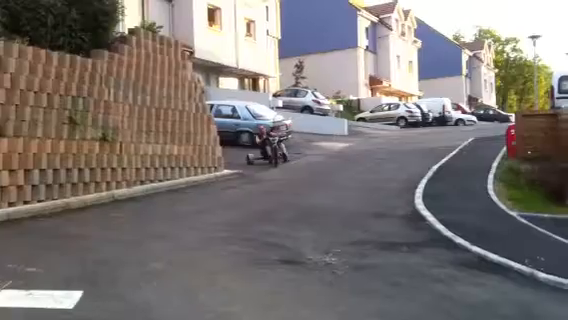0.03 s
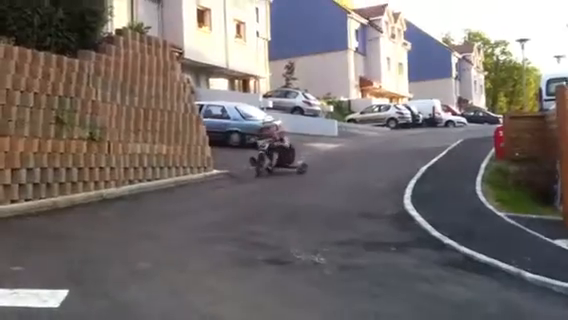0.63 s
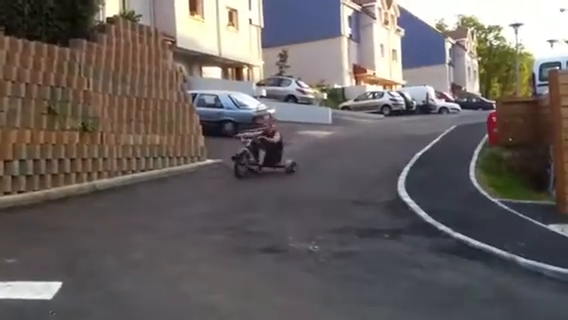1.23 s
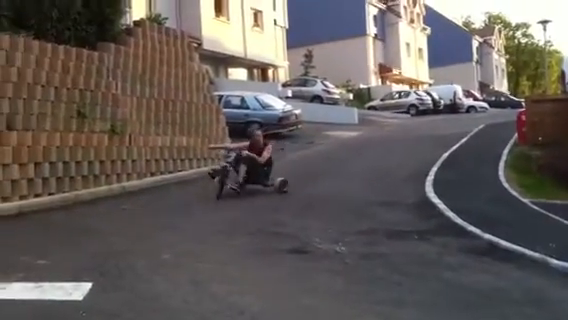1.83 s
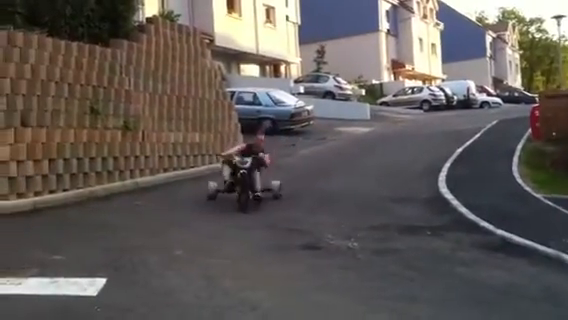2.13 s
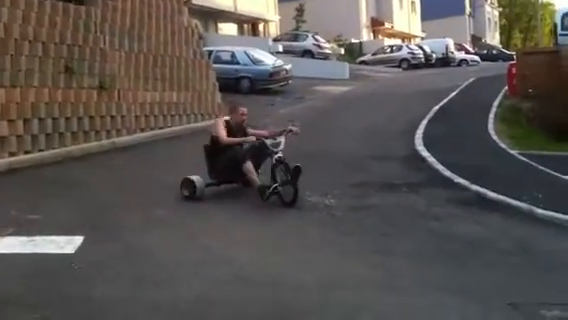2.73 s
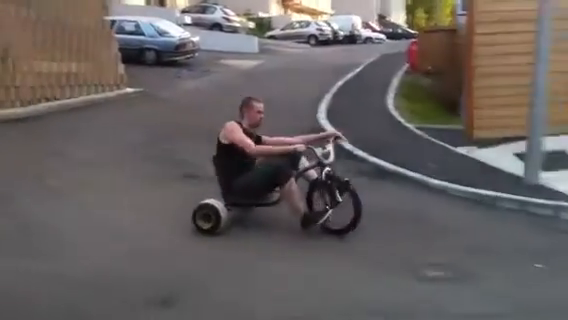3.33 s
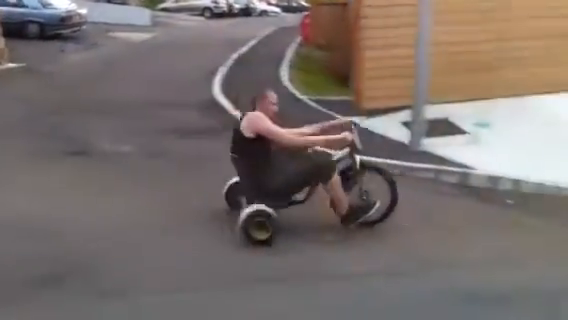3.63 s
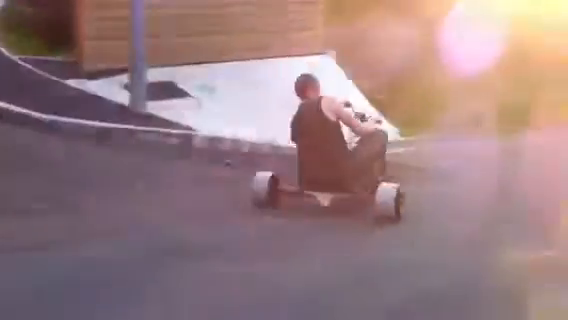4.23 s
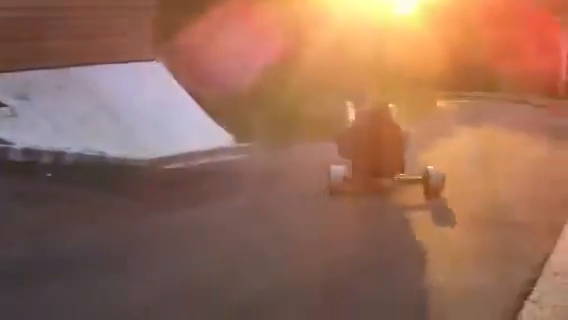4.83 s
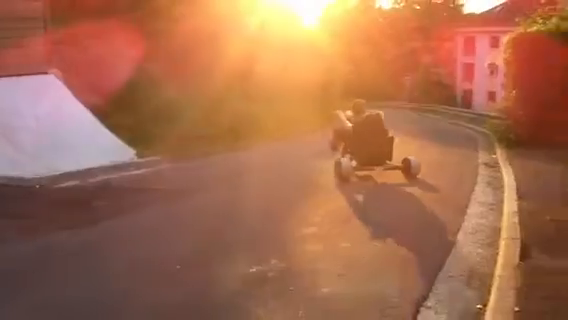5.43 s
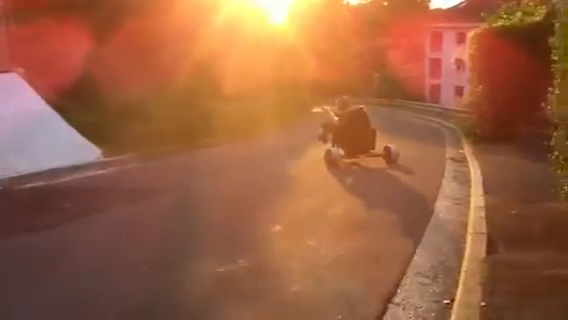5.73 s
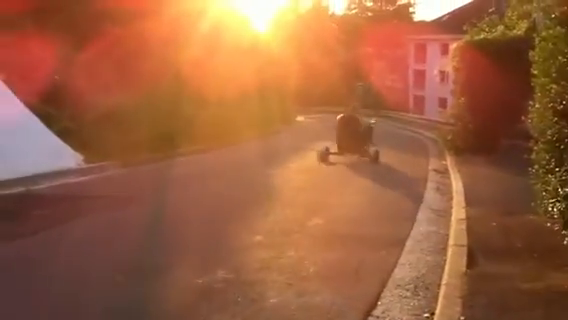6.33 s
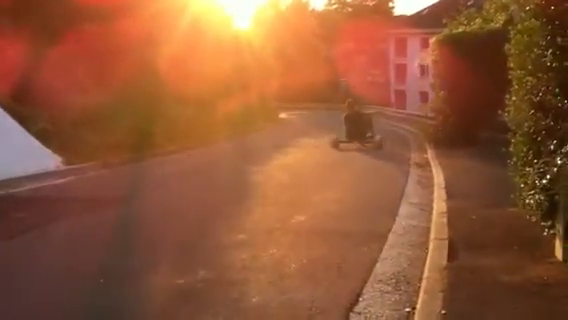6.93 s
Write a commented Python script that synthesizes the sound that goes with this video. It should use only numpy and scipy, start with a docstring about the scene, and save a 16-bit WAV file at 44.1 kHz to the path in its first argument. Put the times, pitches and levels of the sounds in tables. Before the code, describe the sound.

A drift trike approaches, slides past with plastic wheels grinding over asphalt and cracking loose stones, then rolls away down the street.

```python
"""A drift trike coasts down a street, slides past about 4.5 m from the microphone and rolls away.
Its hard plastic rear wheels grind over the asphalt grit and crack loose stones; the frame thrums and
knocks. The wheels sound lower from behind than from the front. Wall and house fronts throw back a
short echo; behind it lie the hum of the town and, late on, a distant car. One fixed microphone, mono,
with a gain control that ducks after loud cracks."""
import sys
import numpy as np
from scipy import signal
from scipy.fft import rfft, irfft
from scipy.io import wavfile
from scipy.ndimage import uniform_filter1d

SR = 44100
rng = np.random.default_rng(int(sys.argv[2]) if len(sys.argv) > 2 else 0)


def wrap_up_sound(samples):
    """Save the sound to the file named by the first command line argument, as 16-bit audio."""
    columns = np.atleast_2d(samples).T
    # keep every value between -1 and 1, then stretch to whole-number steps
    tamed = np.clip(columns, -1, 1)
    steps = np.round(tamed * 32767).astype(np.int16)
    wavfile.write(sys.argv[1], SR, steps)


N = 312228
TIME = np.arange(N) / SR
SPEED_M_S, PASS_S, CLOSEST_M = 5.15, 3.604, 4.49  # the trike's path past the microphone
TURN_S, TURN_EASE_S = 4.7, 0.63  # it swings its back to the microphone: middle, time scale

# Skids of the wheels' plastic sleeves, before the loss with distance:
# start_s, length_s, rasp_db, fade_db_per_s, hiss_over_rasp_db, ring_over_rasp_db, grit_share
SKIDS = [(0.067, 0.15, -30, 5, 4, -25, 0.8), (0.222, 0.71, -23.5, 3.5, 0, -19, 0.9),
         (0.242, 0.039, -21, 5, 0, -11, 0.9), (0.41, 0.077, -25, 5, 0, -4, 1),
         (1.01, 0.56, -35.5, -1.5, 4, -8, 0.3), (1.56, 0.13, -31, 4, 2, -9, 0.2),
         (2.078, 0.45, -30, -1, -5, -5.5, 0.76), (2.594, 0.46, -30, 11, -3, -17, 0.2),
         (3.106, 0.42, -29, 20, -2, -18, 0), (3.615, 0.43, -35, -5, -3.5, -7, 0),
         (3.847, 0.11, -33.5, -4, 4, -21, 0), (4.078, 0.13, -32.5, -24, 1, 0.5, 0.4),
         (4.237, 0.2, -30, 12, 3.5, -3.5, 0.5), (4.446, 0.46, -31.5, -6.5, -0.5, -6.5, 0.5),
         (4.919, 1.07, -28.5, 1.5, 2, -4, 0.37), (4.98, 0.12, -28.5, 0, -10, -5, 0.2),
         (6, 0.23, -36, 9, 7, -2, 0.2), (6.254, 0.15, -31.5, 0, 1.5, -9, 0.5),
         (6.435, 0.84, -44.5, 9.5, 8.5, -7, 0.5)]
# Brief dips in loudness: middle_s, half_length_s, dip_db
LEVEL_DIPS = [(1.336, 0.087, -4.5), (1.92, 0.12, -1.5), (2.059, 0.0051, -10), (2.356, 0.021, -3.5),
              (2.58, 0.061, -2.5), (3.57, 0.037, -2), (4.094, 0.055, -4.5), (6.244, 0.022, -1.5)]
# Rough patches of road: middle_s, half_length_s, roar_lift_db, thrum_lift_db
ROUGH_PATCHES = [(0.266, 0.022, 9, 13), (0.382, 0.063, 9, 7.5), (0.533, 0.037, 8, 9.5),
                 (.85, 0.072, 0.5, -5), (1.228, 0.027, 8.5, 3), (1.466, 0.087, 6.5, 4.5),
                 (1.962, 0.27, -1, -1.5), (2.544, 0.084, 3.5, 2.5), (2.923, 0.074, 1.5, 5.5),
                 (3.08, 0.017, -7, -1), (3.28, 0.37, 0, 1), (3.327, 0.042, 0.5, -5), (3.68, 0.11, 3, -0.5),
                 (3.875, 0.024, 3, 5.5), (5.04, 0.2, 4.5, -3.5), (5.7, 0.24, 1, 3.5), (6.305, 0.05, 8.5, 5),
                 (6.662, 0.025, 1, 9)]
# Hollow roar of the rolling wheels: frequency_hz, gain_db
ROAR_COLOUR = [(200, -29), (400, -14), (480, 6), (570, -2.5), (700, -2), (790, -16), (870, 4.5), (1000, 7),
               (1170, -10.5), (1400, 5), (1600, 1), (2400, -6), (3400, -37), (6000, -52)]
# The same roar close to the microphone: frequency_hz, gain_db
CLOSE_ROAR_COLOUR = [(150, -37.5), (290, -2), (390, -16.5), (510, -0.5), (600, -1), (700, 4), (780, -2),
                     (870, -8.5), (1020, 2), (1200, 3), (1600, -0.5), (2400, -11), (3200, -42), (6000, -57)]
# Weight of that close colour in the roar: time_s, share
CLOSE_SHARE = [(3.0, 0.64), (3.7, 1), (4.8, 1), (5.5, 0.64)]
# Midrange rasp of plastic on asphalt: frequency_hz, gain_db
RASP_COLOUR = [(500, -49), (1050, -22.5), (1400, -2), (1700, -2), (2100, 1), (2380, -4), (2620, -2),
               (2950, -9), (3400, -14.5), (4300, -21.5), (7000, -53)]
# Hiss of the finest grit: frequency_hz, gain_db
HISS_COLOUR = [(1500, -43.5), (2300, -14), (2650, 4), (2950, -0.5), (3600, -7), (4150, 2.5), (5000, 7.5),
               (5900, 7.5), (6900, 4.5), (8100, -7), (9200, -.5), (10200, 0), (11400, -4.5), (12800, -16),
               (14800, -13.5), (21000, -36)]
# Dry crackle of crushed sand: frequency_hz, gain_db
SAND_COLOUR = [(1200, -22), (2600, -3), (3500, 4.5), (5200, -2.5), (7200, -0.5), (8800, 0), (11000, -10.5),
               (13000, -19.5), (21000, -28)]
# The wheels' resonances sink as the trike passes and turns away: time_s, pitch_factor
WHEEL_STRETCH = [(.5, 0.95), (1.6, 1.03), (2.8, 1.014), (3.65, 0.98), (4.27, 0.94), (4.7, .81),
                 (5.17, 0.74), (5.7, 0.73), (6.8, 0.71)]
# Narrow resonance of a slipping sleeve: frequency_hz, gain_db
SLEEVE_COLOUR = [(900, -71.5), (1620, -26.5), (1780, -12), (1870, -2.5), (1970, -7), (2150, -31),
                 (4000, -51)]
# Each sleeve's pitch shifts with load and slip: time_s, first_pitch_factor, second_pitch_factor
SLEEVE_STRETCH = [(0.2, 1.06, 1.3), (2.3, 0.93, 1.2), (3.1, 1, 1.05), (3.7, 0.9, 1), (4.2, 0.94, 1.01),
                  (4.7, 0.88, 1.06), (5.1, 0.87, 1.02), (5.8, 0.82, 1.02), (6.4, 0.72, 1.0)]
# A wheel catches and chirps: start_s, length_s, start_hz, end_hz, level_db
SCUFFS = [(0.117, 0.063, 960, 1407, -42), (.549, 0.016, 1400, 1160, -35.5), (1.417, 0.12, 890, 862, -44)]
# Stones cracking under the wheels, levels as energy in 1 ms: start_s, clack_db, snap_db, decay_ms
STONES = [(0.102, -27, -25.5, 0.78), (0.107, -36, -36, 0.57), (0.2332, -34, -25, 1.7),
          (0.2447, -22.5, -19, 0.8), (0.286, -25, -28, 0.44), (0.384, -26, -27, 0.37),
          (0.395, -22, -33, .4), (0.451, -18.5, -27, 0.61), (0.5255, -18, -40, 0.41),
          (0.601, -18, -19.5, 2.3), (.631, -27, -39, .6), (0.679, -23, -38, 0.44), (0.9117, -27, -26, 0.63),
          (1.205, -17, -23, 2.6), (1.2495, -21, -29, 1.2), (1.327, -36, -37, 1.2), (1.5732, -32, -23, 0.61),
          (1.656, -31, -25, 1.5), (1.685, -19.5, -29, 0.87), (1.831, -40, -33.5, 1.8),
          (2.217, -13.5, -15.5, 0.65), (2.265, -15.5, -23, 0.39), (2.3124, -9.5, -17.5, 0.85),
          (2.3643, -15.5, -24.5, 0.43), (2.382, -28, -21.5, .5), (2.472, -26, -32, 0.34),
          (2.7843, -14.5, -14, 1.5), (2.8412, -18, -14, 1.5), (2.881, -24, -25, .6),
          (2.987, -18, -19.5, 0.93), (3.041, -27, -19, 3.2), (3.12, -17.5, -19.5, 2.5),
          (3.151, -14.5, -14.5, 0.45), (3.178, -21, -12, 2.6), (3.187, -18, -15.5, 1.1),
          (3.242, -31, -18, 0.72), (3.26, -24, -37, 1.8), (3.426, -26, -12.5, 2.7), (3.527, -23, -23, 1.2),
          (3.661, -21.5, -22, 0.54), (3.832, -27, -14, 0.45), (3.9118, -14, -13.5, 0.4),
          (3.92, -10, -23, 0.83), (3.924, -13, -13, .45), (3.966, -34, -25, 1.4), (4.414, -14.5, -18, 3),
          (5.076, -22, -21, 0.35), (5.482, -25, -26, 0.6), (5.889, -32, -31, 0.46), (6.186, -34, -34, 0.69),
          (6.211, -40, -36, 0.83), (6.382, -27, -26.5, 0.73), (6.852, -32, -40, 0.43),
          (6.925, -46, -35, 1.5)]
# Bright snap of a stone: frequency_hz, gain_db
SNAP_COLOUR = [(1500, -7), (3200, 1), (4800, 12.5), (6100, 15), (8000, 5), (10000, 8), (12000, 1.5),
               (15000, -5), (21000, -22)]
# Low thrum of tyre and frame: frequency_hz, gain_db
THRUM_COLOUR = [(25, -26), (55, -27), (100, -17.5), (150, -6), (195, 2), (240, -1), (330, -6), (420, -4.5),
                (560, -15), (1200, -46.5)]
# Bumps that knock the frame, level as energy in 1 ms: start_s, level_db, decay_ms
KNOCKS = [(1.411, -22.5, 2.6), (3.179, -15.5, 1.1), (3.4245, -20, 3), (3.429, -10, 1.2), (3.434, -21, 1.1),
          (3.913, -16.5, 1.4), (3.924, -19, 1.5), (6.637, -26, 1.9)]
# Modes of frame and seat: pitch_hz, level_db, t60_s
FRAME_MODES = [(323, -6, .022), (545, 3, .009), (696, -10, .02), (1090, 6, .016), (1550, 2, .014),
               (1790, 1, .012), (2750, 8, .008)]
# A car far down the street: time_s, level_db, pitch_factor
CAR_APPROACH = [(0.1, -85, 1.3), (5.5, -60, 1.02), (6.3, -51.5, 0.88), (6.85, -45.5, 0.98),
                (7.05, -46, 1.12)]
# Drone of that car: frequency_hz, gain_db
CAR_COLOUR = [(120, -32), (300, -12), (385, 5.5), (425, -6), (470, 5.5), (525, 0.5), (700, -9), (800, -22),
              (980, -6.5), (1170, -22), (2500, -37.5)]
# Hum of the town all around: frequency_hz, gain_db
TOWN_COLOUR = [(25, -44), (80, -25), (180, 0), (260, -2), (360, -6), (430, -3), (520, 4), (690, 0),
               (800, -11), (1000, -4), (1170, -12), (1400, -9), (1900, -13), (2700, -30), (3800, -24),
               (7000, -31), (11000, -37), (15000, -47)]


def wheels(chatter_db=2.5, judder_db=1.36, flicker_db=2.4):
    """The sleeves grab and slip on grit that rings the wheels, more evenly as the trike straightens."""
    rasp_gain, hiss_gain, ring_gain, gritty = scraping()
    stretch, = curves(WHEEL_STRETCH)
    grains = grit(per_s=1500, spread_db=2)
    # the finest grit is too light to stir the low resonances, so it only hisses
    fine_grains = unit(grains + grit(per_s=2700, spread_db=8.5))
    uneven = turning(front=0.6, rear=0.35)
    grip_db = chatter_db * walk(170) + judder_db * walk(40)
    drive = unit(undb(grip_db * uneven)) * nearness() * level_dips()
    roar = rolling_roar(contact(grains, 0.26 * gritty) * drive)
    rasp_force = contact(grains, 0.6 * gritty) * drive * rasp_gain
    rasp = resonate(rasp_force, RASP_COLOUR, stretch ** 0.73)
    flicker = undb(flicker_db * uneven * walk(70))
    hiss_force = contact(fine_grains, 0.56 * gritty) * drive * hiss_gain * flicker
    hiss = dull_with_distance(resonate(hiss_force, HISS_COLOUR, stretch))
    return roar + rasp + hiss + sleeve_ring(drive * ring_gain, uneven) + sand(drive * hiss_gain)


def scraping(coast_db_per_s=2.3, bite_s=0.02, let_go_s=0.054):
    """Fading roll and skids add in power: gains of rasp, hiss and sleeve ring, and the grit share."""
    coast = undb(-coast_db_per_s * TIME)
    rasp, hiss, ring = ((coast * undb(db)) ** 2 for db in (-28.5, -29.5, -40))
    grit_power = 0.079 * rasp
    for start_s, length_s, rasp_db, fade_db_per_s, hiss_db, ring_db, grit_share in SKIDS:
        age = TIME - start_s
        envelope = np.clip(age / bite_s, 0, 1) * np.exp(-np.maximum(age - length_s, 0) / let_go_s)
        power = (envelope * undb(rasp_db - fade_db_per_s * np.clip(age, 0, length_s))) ** 2
        rasp += power
        hiss += power * undb(hiss_db) ** 2
        ring += power * undb(ring_db) ** 2
        grit_power += power * grit_share
    return np.sqrt(rasp), np.sqrt(hiss), np.sqrt(ring), grit_power / rasp


def grit(per_s, spread_db):
    """Grains of asphalt strike the sleeves: many small, a few large."""
    struck = rng.random(N) < per_s / SR
    sizes = undb(spread_db * np.minimum(rng.standard_exponential(N), 5))
    return unit(struck * sizes * rng.choice([-1, 1], N))


def contact(grains, share):
    """Separate grains stand out over the blur of countless tiny ones."""
    return np.sqrt(share) * grains + np.sqrt(1 - share) * rng.standard_normal(N)


def level_dips():
    """The loudness dips briefly here and there."""
    return undb(sum(db * bell(s, half_s) for s, half_s, db in LEVEL_DIPS))


def roughness():
    """Rough road lifts the roar and the thrum: one curve in dB for each."""
    return sum(np.outer(lifts_db, bell(s, half_s)) for s, half_s, *lifts_db in ROUGH_PATCHES)


def rolling_roar(force, wander=0.015):
    """The wheels roar, their resonances wandering as they swivel; the colour changes close by."""
    lift_db, _ = roughness()
    force = force * undb(-33 + lift_db + turning(front=0, rear=1))
    share, = curves(CLOSE_SHARE)
    close, far = np.sqrt(share), np.sqrt(1 - share)
    swivel = 1 + wander * walk(9)
    far_roar = resonate(force * far, ROAR_COLOUR, swivel)
    close_roar = resonate(force * close, CLOSE_ROAR_COLOUR, swivel)
    return (far_roar + close_roar) / (far + close)


def sleeve_ring(gain, uneven, stutter_db=2.5, steps_per_s=55, wander=0.032):
    """Sideways slip rings each of the two sleeves in its own narrow, stuttering band."""
    out = np.zeros(N)
    for pitch in curves(SLEEVE_STRETCH):
        stutter = unit(undb(stutter_db * uneven * walk(steps_per_s)))
        rub = rng.standard_normal(N) * gain * stutter * undb(-0.5)
        out += resonate(rub, SLEEVE_COLOUR, pitch * (1 + wander * walk(steps_per_s)))
    return out


def sand(gain):
    """Loose sand is crushed under the sliding sleeves; its crackle carries only a short way."""
    return resonate(grit(per_s=2700, spread_db=4) * gain * undb(-5) * nearness(), SAND_COLOUR)


def scuffs(width_hz=380):
    """A wheel catches for a moment and gives a rough, gliding chirp."""
    out = np.zeros(N)
    for start_s, length_s, start_hz, end_hz, level_db in SCUFFS:
        n = int(length_s * SR)
        phase = 2 * np.pi * np.cumsum(np.linspace(start_hz, end_hz, n)) / SR
        chirp = walk(width_hz)[:n] * np.sin(phase) + walk(width_hz)[:n] * np.cos(phase)
        add(out, start_s, undb(level_db) * unit(chirp * np.hanning(n)))
    return out


def stones():
    """A loose stone cracks under a sleeve: a short clack of the wheel and a bright snap."""
    stretch, = curves(WHEEL_STRETCH)
    out = np.zeros(N)
    for start_s, clack_db, snap_db, decay_ms in STONES:
        factor = stretch[[int(start_s * SR)]]
        for colour, level_db in (RASP_COLOUR, clack_db), (SNAP_COLOUR, snap_db):
            response = irfft(body_spectra(colour, factor))[0]
            add(out, start_s, undb(level_db) * crunch(decay_ms, response))
    return out


def crunch(decay_ms, response, tail_ms=7, snap=0.61):
    """A contact snaps, breaks up, skitters on and rings a body; it holds the energy of 1 ms at rms 1."""
    age_ms = np.arange(1024) / SR * 1000
    age = age_ms / decay_ms
    envelope = np.sqrt(age) * np.exp(-age) + undb(-22) / 2 * np.exp(-age_ms / tail_ms)
    force = rng.standard_normal(len(age)) * envelope
    force[np.argmax(envelope)] += snap
    sound = signal.fftconvolve(force, response)
    return sound * np.sqrt(SR / 1000 / np.sum(sound ** 2))


def frame_thrum(sway_db=1.3):
    """The uneven road keeps tyre and frame thrumming, softer from behind."""
    _, lift_db = roughness()
    level_db = -45.5 + lift_db + turning(front=0, rear=-4) + sway_db * walk(18)
    return resonate(rng.standard_normal(N) * undb(level_db) * nearness() ** 0.67, THRUM_COLOUR)


def frame_knocks(band_hz=(500, 2800)):
    """Bigger bumps knock the modes of frame and seat."""
    t = np.arange(8192) / SR
    modes = sum(undb(db - 60 * t / t60) * np.sin(2 * np.pi * hz * t) for hz, db, t60 in FRAME_MODES)
    # thin tubes radiate little bass, and the tyre cushions the treble
    modes = signal.sosfilt(signal.butter(2, band_hz, "band", fs=SR, output="sos"), modes)
    out = np.zeros(N)
    for start_s, level_db, decay_ms in KNOCKS:
        add(out, start_s, undb(level_db) * crunch(decay_ms, modes))
    return out


def nearness():
    """The trike's gain at the microphone: 1 at its closest, falling as 1 / distance."""
    return CLOSEST_M / np.hypot(CLOSEST_M, SPEED_M_S * (TIME - PASS_S))


def turning(front, rear):
    """A value slides from its front to its rear setting as the trike turns from the microphone."""
    return front + (rear - front) / (1 + np.exp((TURN_S - TIME) / TURN_EASE_S))


def dull_with_distance(x, corner_hz=6500):
    """The treble fades faster with distance than the rest."""
    low = signal.sosfilt(signal.butter(1, corner_hz, fs=SR, output="sos"), x)
    return low + (x - low) * nearness() ** 0.77


def wall_echo(x, t60_s=0.22, wet_db=-13, delay_s=0.0075, top_hz=6000):
    """Wall and house fronts scatter reflections back to the microphone."""
    t = np.arange(SR // 2) / SR
    tail = rng.standard_normal(len(t)) * undb(-60 * t / t60_s) * (t > delay_s)
    tail /= np.sqrt(np.sum(tail ** 2))
    tail = signal.sosfilt(signal.butter(1, top_hz, fs=SR, output="sos"), tail)
    return undb(wet_db) * signal.fftconvolve(x, tail)[:N]


def distant_car():
    """A car drones far off, growing louder as it draws nearer and rising at the very end."""
    level_db, pitch = curves(CAR_APPROACH)
    return resonate(rng.standard_normal(N), CAR_COLOUR, pitch) * undb(level_db)


def town_hum(level_db=-47, swell_db=1):
    """The town hums behind everything, swelling slightly."""
    return resonate(rng.standard_normal(N), TOWN_COLOUR) * undb(level_db + swell_db * walk(4.2))


def resonate(x, colour, stretch=None, size=1024):
    """Pass x through a body block by block; stretch moves its resonances over time."""
    blocks = np.pad(x, (0, -N % size)).reshape(-1, size)
    factors = np.ones(1) if stretch is None else stretch[::size]
    rung = irfft(rfft(blocks, 2 * size) * body_spectra(colour, factors, size))
    heads, tails = rung[:, :size].ravel(), rung[:, size:].ravel()
    return heads[:N] + np.r_[np.zeros(size), tails][:N]


def body_spectra(colour, factors, size=1024):
    """Causal frequency responses of unit power gain, one for each factor on the resonances."""
    hz, db = np.transpose(colour)
    bins_hz = np.maximum(np.arange(size + 1) * SR / (2 * size), 1)
    gain = undb(np.interp(np.log(bins_hz / factors[:, None]), np.log(hz), db))
    gain /= np.sqrt(np.mean(gain ** 2, axis=1, keepdims=True))
    cepstrum = irfft(np.log(gain))
    causal_fold = np.r_[1, np.full(size - 1, 2), 1, np.zeros(size - 1)]
    return np.exp(rfft(cepstrum * causal_fold))


def undb(db):
    """Decibels to gain."""
    return 10 ** (db / 20)


def unit(x):
    """Scale to rms 1."""
    return x / np.sqrt(np.mean(x ** 2))


def bell(middle_s, half_s):
    """A smooth bump in time, of height 1."""
    return np.exp(-((TIME - middle_s) / half_s) ** 2)


def curves(table):
    """The columns of a table, joined by straight lines in time."""
    times_s, *columns = np.transpose(table)
    return [np.interp(TIME, times_s, column) for column in columns]


def walk(per_s):
    """Glide to a new random value per_s times a second; rms 1."""
    hold = int(SR / per_s)
    return unit(uniform_filter1d(rng.standard_normal(N)[np.arange(N) // hold], hold))


def add(track, start_s, sound):
    """Mix a sound into a track."""
    i = int(start_s * SR)
    track[i:i + len(sound)] += sound[:N - i]


def duck(x, threshold=0.37, slope=0.5, attack_s=0.0079, release_s=0.15):
    """Gain control: a sharp peak slips through, then the level ducks and recovers."""
    excess = np.log(np.maximum(np.abs(x) / threshold, 1))
    fall = TIME / release_s
    held = np.maximum.accumulate(excess + fall, axis=-1) - fall
    pole = np.exp(-1 / (attack_s * SR))
    return x * np.exp(-slope * signal.lfilter([1 - pole], [1, -pole], held))


def scene():
    """From the roadside, in mono: the trike, its echo, the far car and the town."""
    trike = wheels() + scuffs() + stones() + frame_thrum() + frame_knocks()
    return (trike + wall_echo(trike) + distant_car() + town_hum())[None]


def record(dry, silence_s=0.084, top_hz=16000):
    """The sound starts after a brief silence, ducks after loud cracks and has a steep top edge."""
    top_cut = signal.ellip(8, 0.2, 70, top_hz, fs=SR, output="sos")
    return signal.sosfilt(top_cut, duck(dry) * (TIME > silence_s))


dry = scene()
out = record(dry)
wrap_up_sound(out)
```